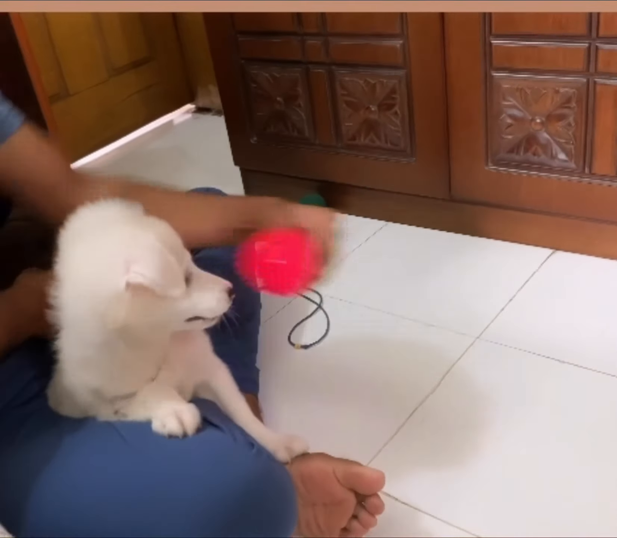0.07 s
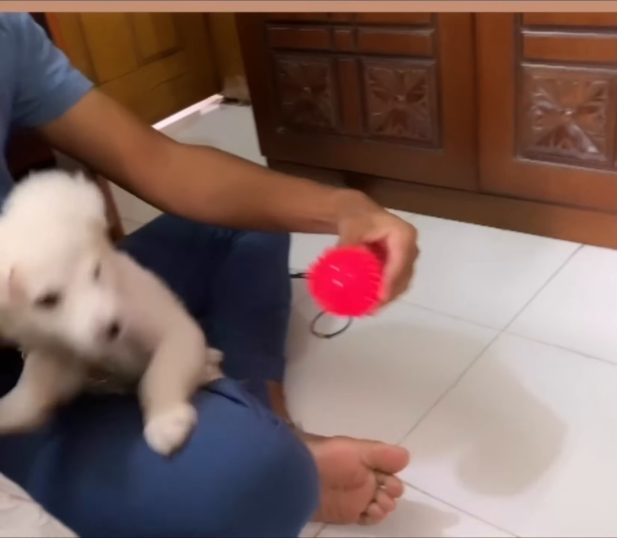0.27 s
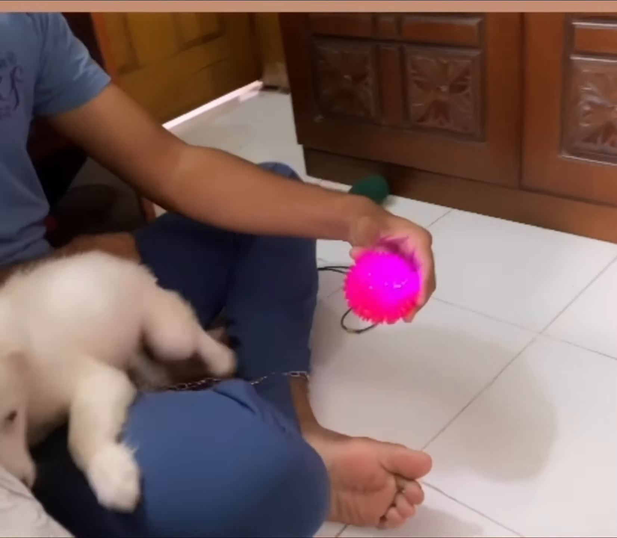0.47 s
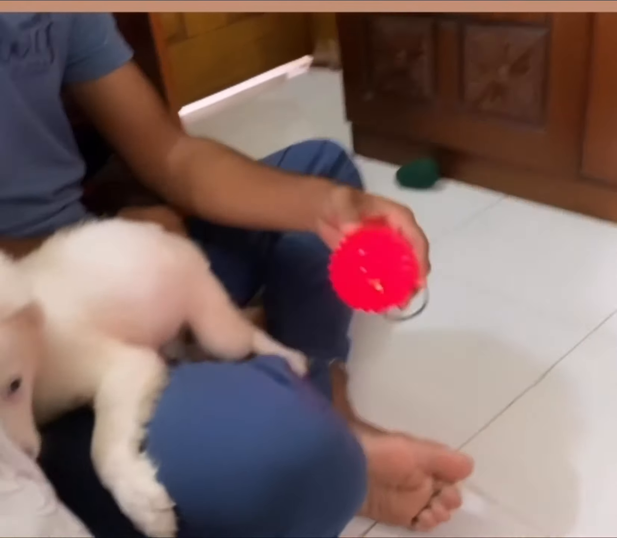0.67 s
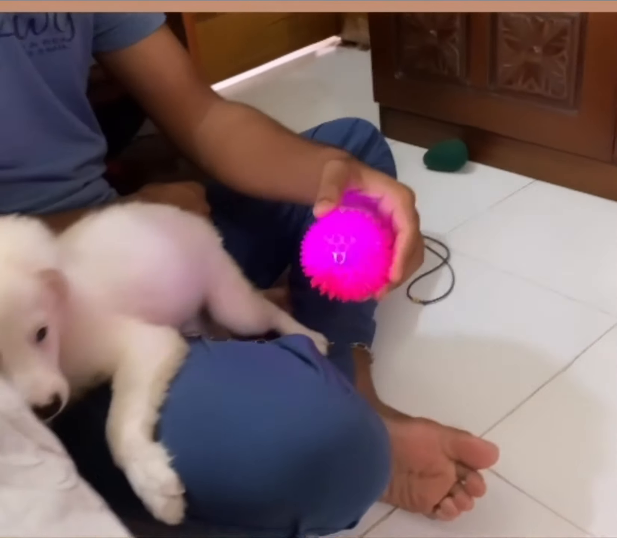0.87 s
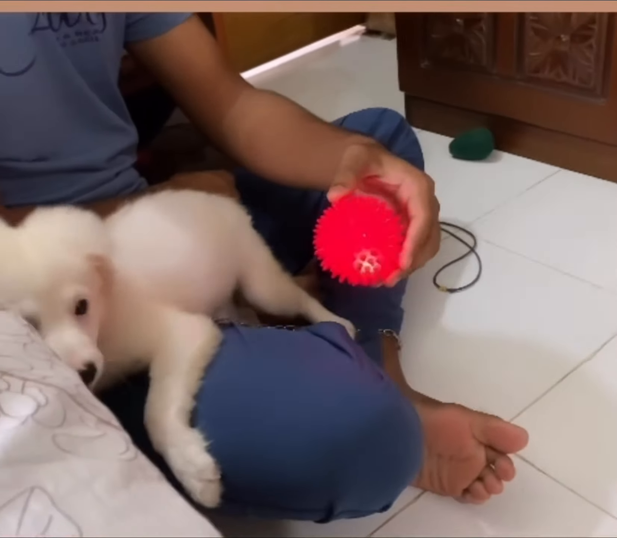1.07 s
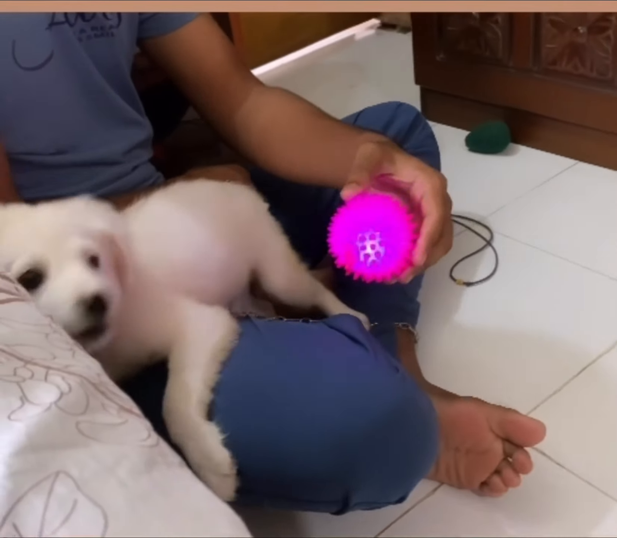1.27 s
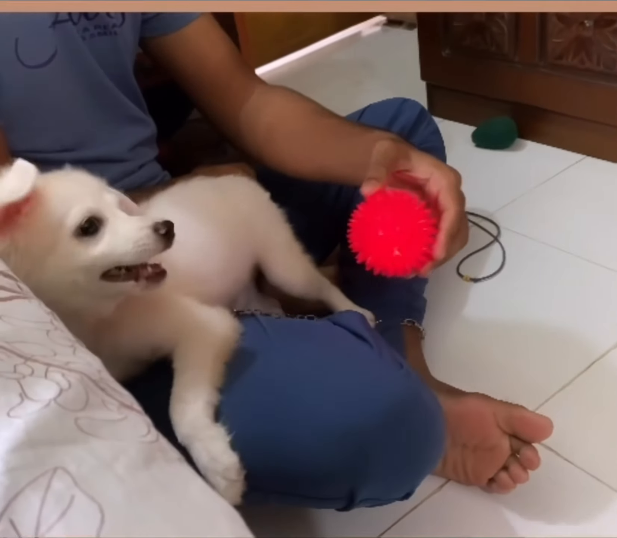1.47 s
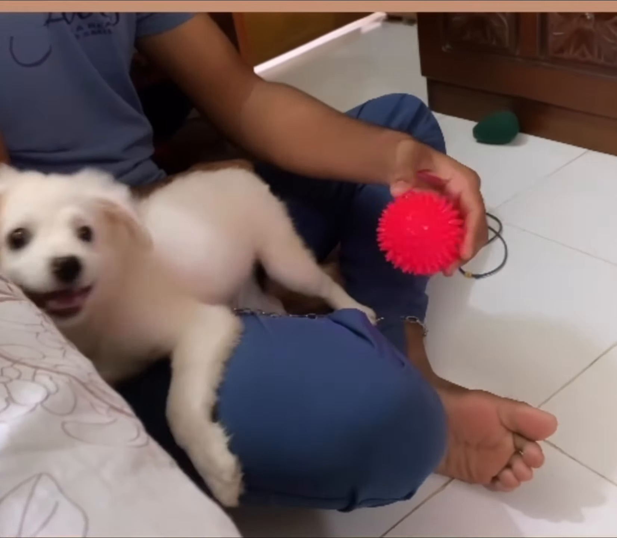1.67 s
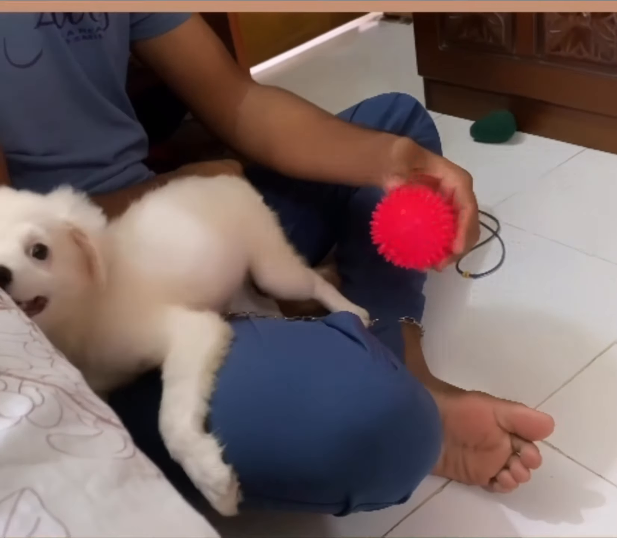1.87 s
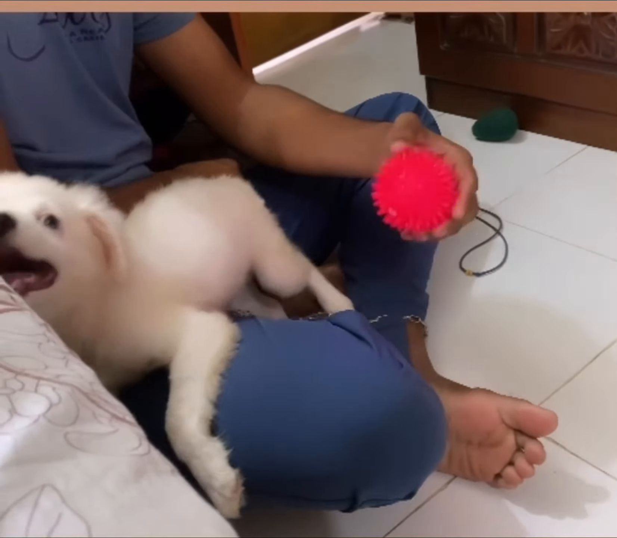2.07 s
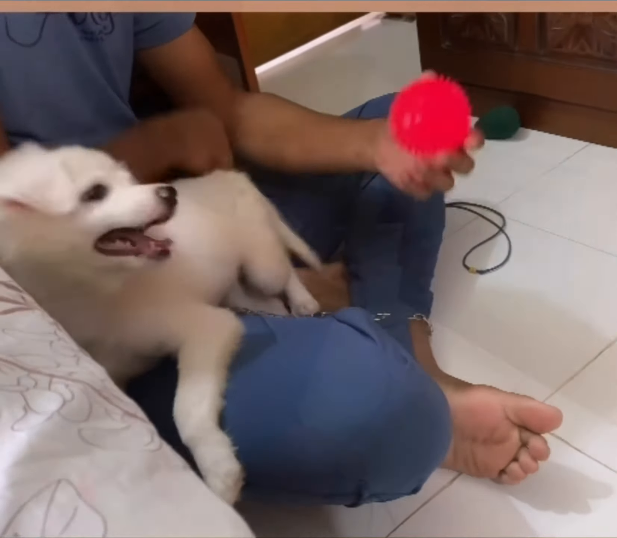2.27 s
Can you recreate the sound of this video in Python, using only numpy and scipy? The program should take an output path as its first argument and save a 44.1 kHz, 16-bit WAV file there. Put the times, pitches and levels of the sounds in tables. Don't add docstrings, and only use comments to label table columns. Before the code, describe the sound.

Near the start and again near the end, a squeaky toy gives a quick two-part squeak, high then lower, with snappy onset and airy hiss; between them only steady fan noise in a hard-floored room, heard on a phone.

```python
import sys
import numpy as np
from scipy import signal
from scipy.fft import rfft, irfft, next_fast_len
from scipy.io import wavfile
from scipy.ndimage import uniform_filter1d, minimum_filter1d, map_coordinates

SR = 44100
rng = np.random.default_rng(int(sys.argv[2]) if len(sys.argv) > 2 else 0)


def ratio(d):
    e = np.asarray(d, float) / 20
    return 10 ** e


def file_out(sig):
    cols = np.atleast_2d(sig).T
    lim = np.clip(cols, -1, 1)
    pcm = np.round(lim * 32767).astype(np.int16)
    wavfile.write(sys.argv[1], SR, pcm)


N = 101430
TOP_HZ = 15800

# [t/s, reed pitch f/Hz, level/dB, snap/dB]
SQUEEZES = [
    [(0.25, 1048, -21, -1.5), (0.274, 1142, -14.5, 1.5), (0.328, 1169, -14.5, -0.5), (0.346, 1111, -16, 3),
     (0.366, 1014, -20.5, -1.5), (0.374, 940, -39, -9)],
    [(1.82, 1047, -16, -3), (1.842, 1148, -15, 3), (1.868, 1138, -13, -1), (1.898, 1032, -21.5, 0.5),
     (1.91, 916, -36.5, -6.5)],
]
# [t/s, reed pitch f/Hz, level/dB, snap/dB]
REFILLS = [
    [(0.405, 832, -15, 15), (0.411, 813, -13, -0.5), (0.445, 934, -15.5, 8.5), (0.471, 883, -16, 3.5),
     (0.495, 776, -16.5, 3), (0.511, 732, -23.5, 7.5), (0.524, 669, -43.5, -12)],
    [(1.947, 800, -19, 6.5), (1.955, 817.5, -11.5, 2), (1.971, 837, -13.5, 0), (2.017, 727, -21.5, 7),
     (2.031, 677, -40.5, -7)],
]
# [f/Hz, level/dB]
TUBE = [(5200, 1), (5600, -6.5), (6000, -16.5), (6900, 3), (7600, 9), (8600, 3), (9500, -7), (16000, -27)]


def unit(x):
    return x / np.sqrt(np.mean(x ** 2) + 1e-20)


def along(points, hz):
    f, v = np.transpose(points)
    return np.interp(np.log(hz + 1), np.log(f + 1), v)


def wobble(rate, size):
    knots = rng.standard_normal(int(size * rate / SR) + 4)
    return map_coordinates(knots, [np.arange(size) * rate / SR])


def smooth(x, s):
    width = max(int(s * SR), 1)
    once = uniform_filter1d(x, width, mode="nearest")
    return uniform_filter1d(once, width, mode="nearest")


def coloured(x, *spectra):
    m = 2 * next_fast_len(len(x) // 2 + 8192)
    hz = np.fft.rfftfreq(m, 1 / SR)
    gain = ratio(sum(along(s, hz) for s in spectra))
    cep = irfft(np.log(gain + 1e-6), m)
    cep = np.concatenate([cep[:1], 2 * cep[1:m // 2], np.zeros(m // 2)])
    return irfft(rfft(x, m) * np.exp(rfft(cep)), m)[:len(x)]


def noise(*spectra):
    return unit(coloured(rng.standard_normal(N + 8192), *spectra)[8192:])


def duck(db, recover_s):
    t = np.arange(N) / SR
    spans = [(rows[0][0], rows[-1][0]) for rows in [*SQUEEZES, *REFILLS]]
    down = [(t > start) * np.exp(-np.clip(t - end, 0, None) / recover_s) for start, end in spans]
    return ratio(db * smooth(np.max(down, axis=0), 0.0033))


def fan():
    # [f/Hz, level/dB per Hz]
    low_colour = [(12, -39.5), (20, -9.5), (59, 2), (85, 0), (119, -3), (251, -4), (448, -11), (568, -22.5),
                  (700, -25), (910, -58), (1540, -120)]
    # [f/Hz, level/dB per Hz]
    high_colour = [(350, -34), (600, -1), (1150, -3.5), (1850, -11), (2010, -13.5), (4130, -20.5),
                   (6120, -36.5), (9570, -37), (15400, -51.5)]
    rumble = noise(low_colour) * ratio(-28.5 + 1.3 * wobble(4, N))
    rush = noise(high_colour) * ratio(-39.5 + 0.6 * wobble(15, N))
    return duck(-2, 0.36) * (rumble + duck(-4.5, 0.03) * rush)


def hiss():
    # [start t/s, end t/s, level/dB]
    flows = [
        (0.216, 0.504, -35.5),
        (1.787, 2.004, -38),
    ]
    # [f/Hz, level/dB]
    air_colour = [(1000, -37.5), (3000, -18.5), (6000, -14.5), (8000, -9), (11000, -4), (16000, -19.5)]
    rise_s, t60_s = 0.082, 0.387
    t = np.arange(N) / SR
    flow = np.zeros(N)
    for start, end, db in flows:
        rise = np.clip((t - start) / rise_s, 0, 1)
        flow += rise * ratio(db - 60 * np.clip(t - end, 0, None) / t60_s)
    return flow * ratio(0.85 * wobble(40, N)) * noise(air_colour, TUBE)


def thumps():
    # [t/s, peak level/dB, f/Hz]
    bumps = [
        (0.2481, -12.5, 140),
        (1.82, -36, 146.4),
    ]
    t = np.arange(N) / SR
    out = np.zeros(N)
    for s, db, hz in bumps:
        bend = (np.pi * hz * (t - s) / 2) ** 2
        out += ratio(db) * (1 - 2 * bend) * np.exp(-bend)
    return out


def squeak(rows, tone, gain_db):
    # [f/Hz, level/dB]
    top_ripple = [(10400, 3.5), (11000, -6.5), (11600, 3), (12000, -3.5), (12400, 4.5), (13000, -10),
                  (13800, -2.5), (15000, 2.5)]
    attack_s, release_s = 0.0022, 0.0083
    s, pitch, db, snap_db = np.transpose(rows)
    t = np.arange(round(s[0] * SR), round((s[-1] + release_s) * SR)) / SR

    hz = smooth(np.interp(t, s, pitch), 0.0032) * (1 - 0.3 * np.exp(-(t - s[0]) / 0.001))
    jitter = 1 + 0.001 * wobble(300, len(t))
    phase = 2 * np.pi * np.cumsum(hz * jitter) / SR

    k = np.arange(1, 26)[:, None]
    snap = ratio(np.interp(t, s, snap_db) * np.clip(k * hz / 6000 - 0.5, 0, 1))
    in_band = np.clip((TOP_HZ - k * hz) / 500, 0, 1)
    pulses = (np.cos(k * phase) * snap * in_band).sum(0)
    breath = unit(rng.standard_normal(len(t)) * (1 + np.cos(phase)))
    drive = pulses / 3 + ratio(-44) * breath

    size = np.std(coloured(drive, tone, TUBE, top_ripple))
    edges = np.clip((t - s[0]) / attack_s, 0, 1) ** 2 * np.clip((t[-1] - t) / release_s, 0, 1)
    shimmer_db = 0.3 * wobble(110, len(t))
    level = ratio(gain_db + smooth(np.interp(t, s, db), 0.001) + shimmer_db)
    voice = coloured(drive * level * edges, tone, TUBE, top_ripple) / size
    return np.pad(voice, (round(s[0] * SR), N))[:N]


def slaps():
    # [t/s, peak level/dB]
    cracks = [
        (.2521, 0.5),
        (1.8233, 3.5),
    ]
    # [f/Hz, level/dB]
    crack_colour = [(400, -14), (800, 1.5), (1600, -4.5), (5500, -1.5), (9000, -9), (11000, -24.5),
                    (16000, -34.5)]
    t60_s = 0.001
    t = np.arange(800) / SR
    out = np.zeros(N)
    for s, db in cracks:
        burst = rng.standard_normal(len(t)) * ratio(-60 * t / t60_s)
        crack = coloured(burst, crack_colour)
        out[round(s * SR):][:len(t)] += ratio(db) * crack / np.abs(crack).max()
    return out


def ball():
    # [f/Hz, level/dB]
    out_tone = [(600, -8), (1150, -6.5), (3450, -8.5), (4100, -12.5), (4600, -4), (5200, -8), (6000, -0.5),
                (8000, -7.5)]
    # [f/Hz, level/dB]
    in_tone = [(850, -0.5), (1700, -8), (2600, -7), (5300, -15.5), (5800, -22), (6300, -17.5), (7000, -14),
               (10000, -6.5)]
    pushed = sum(squeak(rows, out_tone, 8.5) for rows in SQUEEZES)
    drawn = sum(squeak(rows, in_tone, 4.5) for rows in REFILLS)
    return pushed - drawn + slaps()


def nearby(x):
    # [delay t/s, level/dB]
    bounces = [(.0006, -18), (.0019, -18), (.0033, -16), (.0056, -17), (.0083, -19)]
    # [f/Hz, level/dB]
    bounce_tone = [(500, -16), (3000, -11), (6000, -6), (8000, 0), (16000, 2)]
    copies = np.zeros(N)
    for k, (s, db) in enumerate(bounces):
        copies += (-1) ** k * ratio(db) * np.pad(x, (round(s * SR), 0))[:N]
    return coloured(copies, bounce_tone)


def room(x):
    # [f/Hz, t60/s]
    decay = [(500, .4), (3000, 0.31), (8000, 0.27), (14000, 0.083)]
    # [f/Hz, level/dB]
    send_tone = [(800, -2), (3500, 0.5), (4600, -7), (6000, 0), (8500, -0.5), (11000, 4.5)]
    delay_s = 0.004
    hz, t, z = signal.stft(rng.standard_normal(SR // 2), SR, nperseg=256)
    fade = ratio(-60 * t / along(decay, hz)[:, None])
    tail = signal.istft(z * fade, SR, nperseg=256)[1]
    sent = np.pad(coloured(x, send_tone), (round(delay_s * SR), 0))
    return ratio(-22.5) * signal.fftconvolve(sent, tail / np.linalg.norm(tail))[:N]


def scene():
    toy = ball()
    mono = fan() + hiss() + thumps() + toy + nearby(toy) + room(toy)
    return np.array([mono, mono])


def band_limit(x):
    return signal.sosfilt(signal.butter(12, 16500, fs=SR, output="sos"), x)


def record(dry):
    spread_s, limit, limit_s = 0.0004, 0.98, 0.004
    m = next_fast_len(N + 4096)
    hz = np.fft.rfftfreq(m, 1 / SR)
    spread = np.exp(1j * np.pi * spread_s * hz ** 2 / 10000)
    band = np.clip((TOP_HZ - hz) / 60, 0, 1)
    x = irfft(rfft(dry, m) * spread * band, m)[:, :N]
    need = np.minimum(1, limit / (np.abs(x[0]) + 1e-9))
    held = minimum_filter1d(need, int(4 * limit_s * SR))
    mix = x * smooth(held, limit_s)
    return band_limit(mix)


dry = scene()
out = record(dry)
file_out(out)
```